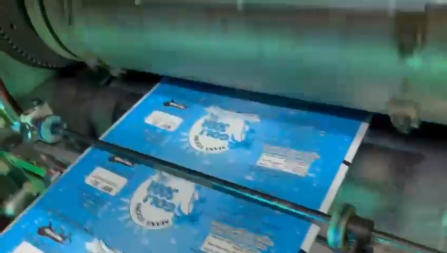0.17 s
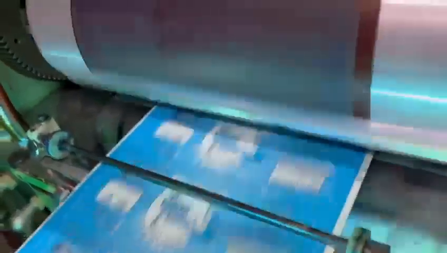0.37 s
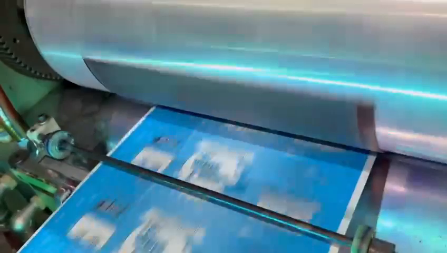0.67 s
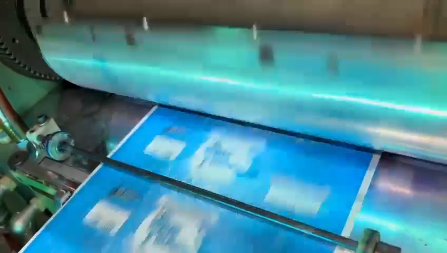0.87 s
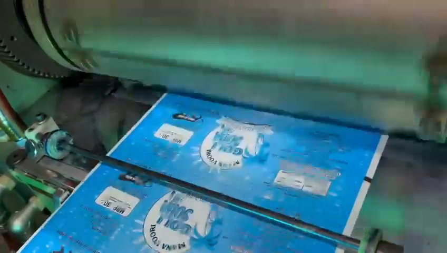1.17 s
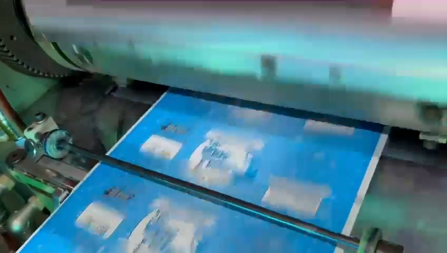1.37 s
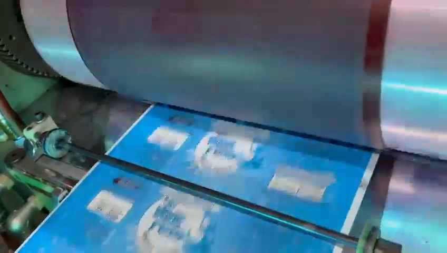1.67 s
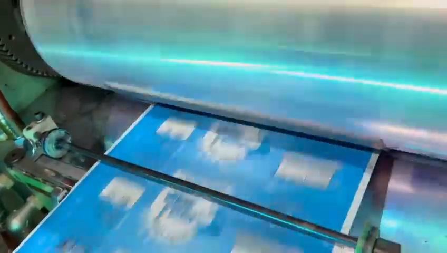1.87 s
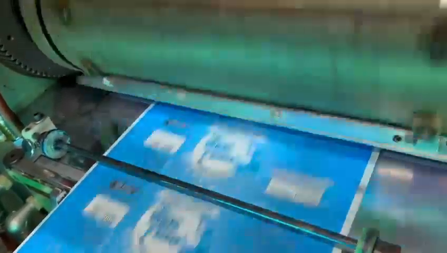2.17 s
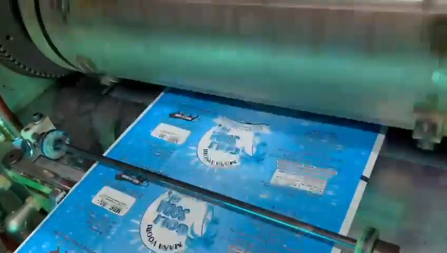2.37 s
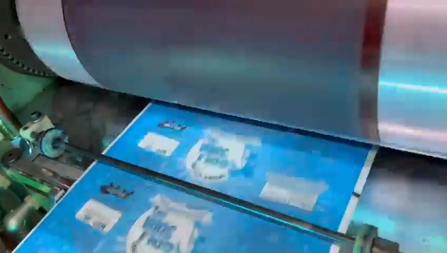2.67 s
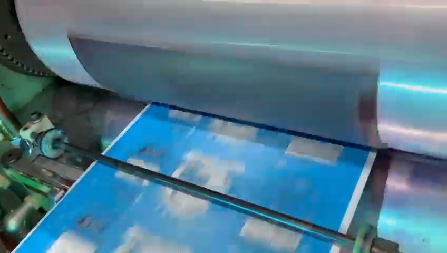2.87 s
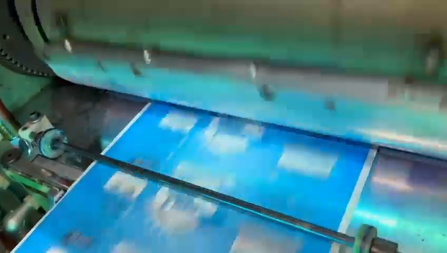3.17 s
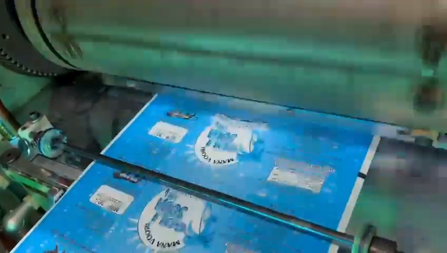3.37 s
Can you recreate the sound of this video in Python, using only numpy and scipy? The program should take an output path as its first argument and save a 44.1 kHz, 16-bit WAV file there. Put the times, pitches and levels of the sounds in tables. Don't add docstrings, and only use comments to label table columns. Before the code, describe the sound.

Dense rolling roar of a running printing press, faint gear tones, quick knocks and airy puffs.

```python
import sys
import numpy as np
from scipy import signal
from scipy.fft import rfft, irfft, next_fast_len
from scipy.io import wavfile
from scipy.ndimage import uniform_filter1d

SR = 44100
rng = np.random.default_rng(int(sys.argv[2]) if len(sys.argv) > 2 else 0)


def master(y):
    cut = np.clip(np.atleast_2d(y).T, -1, 1)
    pcm = np.round(cut * 32767)
    wavfile.write(sys.argv[1], SR, pcm.astype(np.int16))


def level_to_linear(level):
    exponent = np.asarray(level, float) / 20
    return 10 ** exponent


N = 155232

# (frequency [Hz], level [dB per Hz])
RUMBLE_SPECTRUM = [(22, -16), (48, -17), (65, -8.5), (100, 1), (200, -1.5), (300, -1), (420, -5),
                   (700, -17)]
# (frequency [Hz], level [dB per Hz])
ROAR_SPECTRUM = [(290, -30), (500, -4), (994, 0.5), (1310, -4.5), (1560, -3), (2350, -13.5), (2500, -11.5),
                 (2840, -14.5), (3300, -17), (4290, -43.5), (7260, -120)]
# (time [s], level [dB])
LOAD_SWELL = [(0, 1.5), (.3, -3.5), (.6, -3.5), (.9, -2), (1.2, -1), (1.5, -4.5), (1.8, -2.5), (2.1, -1.5),
              (2.4, -3.5), (2.7, -3), (3, -1), (3.25, -2), (3.52, -1.5)]
# (time [s], level [dB])
MESH_LEVEL = [(0, -31), (.3, -27.5), (.4, -42), (.5, -34), (.7, -41), (1.0, -29), (1.2, -30), (1.27, -27),
              (1.42, -29), (1.55, -41), (1.65, -32), (2.1, -33), (2.5, -30), (2.75, -41), (3.05, -33),
              (3.3, -27), (3.4, -31), (3.52, -28)]
# (time [s], level [dB])
WHINE_LEVEL = [(0, -48), (.36, -42), (.4, -34.5), (.52, -37), (.57, -38.5), (1.5, -39.5), (1.65, -40.5),
               (1.72, -51), (1.78, -36), (1.91, -42), (1.97, -36.5), (2.1, -46), (2.25, -37.5), (2.33, -40),
               (2.44, -36.5), (2.54, -42), (2.59, -37.5), (2.65, -41), (2.95, -42), (3.06, -33.5),
               (3.15, -33.5), (3.2, -43), (3.31, -45), (3.44, -32), (3.52, -46)]
# (frequency [Hz], level [dB], width [Hz])
MACHINE_HUMS = [(68, -41, 10), (92, -33, 24), (146, -32, 9), (190, -40, 8), (232, -40, 8), (537, -41, 7),
                (580, -43, 8), (700, -48, 8), (931, -47, 12), (1074, -46, 7), (1162, -48, 14),
                (1280, -51, 12), (1380, -51, 12), (1502, -51, 12), (1610, -54, 30), (1860, -54, 40),
                (2001, -52, 5), (2165, -55, 25), (2870, -56, 20), (3451, -54, 25), (3639, -63, 8),
                (4000, -64, 5), (5668, -60, 50), (6002, -59, 6), (6021, -60, 6), (6040, -62, 6),
                (6625, -63, 5), (6697, -61, 5), (6767, -60, 5)]
# (time [s], peak level [dB], pitch of the frame part [Hz])
CAM_KNOCKS = [(.006, -21.5, 266.4), (.014, -20, 147.4), (.143, -28, 560), (.151, -22, 431),
              (0.329, -27.5, 446), (0.377, -25.5, 289), (.481, -19, 323), (0.637, -26, 208),
              (.712, -23, 297), (0.804, -32.5, 330), (.843, -32, 462), (1.055, -23.5, 328),
              (1.097, -19.5, 283.4), (1.11, -23.5, 180), (1.262, -22.5, 256.4), (1.274, -24, 468),
              (1.594, -24.5, 333), (1.827, -25.5, 301), (1.963, -25, 470), (2.173, -24, 242),
              (2.192, -21.5, 157), (2.225, -23, 461), (2.241, -27, 195), (2.264, -28.5, 236),
              (2.291, -23, 136), (2.378, -26, 248), (2.386, -22, 414), (2.412, -25.5, 155),
              (2.715, -25, 306.5), (2.899, -25.5, 188), (2.947, -23.5, 253), (3.125, -22.5, 181),
              (3.218, -19.5, 117), (3.282, -21.5, 454), (3.292, -23, 343), (3.343, -31, 207),
              (3.46, -30, 128), (3.495, -25, 243), (3.503, -29, 425)]
# (multiple of the knock's pitch [1], level [dB])
FRAME_MODES = [(.62, -8), (1.0, 0), (1.3, -8), (1.75, -12), (2.3, -8), (3.0, -12), (4.1, -16)]
# (time [s], peak level [dB])
GRIPPER_SNAPS = [(.5796, -31), (.7063, -33), (.8435, -32), (.8649, -32), (1.0525, -28), (1.0585, -24),
                 (1.0665, -28), (1.088, -28), (1.6926, -32), (1.9465, -32), (2.1778, -23), (2.186, -28),
                 (2.2008, -22), (2.2055, -27), (2.218, -29), (2.24, -30), (2.3845, -32), (2.5222, -31),
                 (2.808, -34), (3.2945, -25), (3.348, -31)]
# (frequency [Hz], level [dB], width [Hz])
FINGER_MODES = [(3900, 0, 350), (4700, 0, 350), (5600, -4, 450), (6500, -2, 450), (8300, -9, 700),
                (10500, -14, 1200)]
# (time into the turn [s], level [dB])
SUCTION_SWELL = [(0, -35), (.2, -39), (.55, -37.5), (.6, -38), (.65, -37), (.85, -33.5), (.95, -35),
                 (1.05, -33.5), (1.118, -36)]
# (time [s], peak level [dB])
VALVE_PUFFS = [
    (0.575, -36.5),
    (0.844, -43),
    (1.052, -32),
    (1.084, -36),
    (1.693, -40),
    (1.943, -40),
    (2.175, -30.5),
    (2.2, -35.5),
    (2.811, -44),
    (3.292, -40.5),
]
# (frequency [Hz], level [dB per Hz])
HISS_SPECTRUM = [(2500, -19.5), (3400, 3.5), (4500, 2.5), (6500, 6.5), (7200, -4.5), (9000, -4),
                 (10000, 1.5), (11500, -4.5), (12200, -12)]
# (frequency [Hz], share [0-1])
DIRECT_SHARE = [(25, 0.8), (60, 1), (125, 0.95), (250, 0.89), (500, 0.55), (1000, 0.07), (2400, 0.83),
                (4000, 0), (9000, 0.05)]
# (frequency [Hz], level difference [dB])
LEFT_LEAN = [(100, -0.2), (250, -0.7), (500, -3.5), (700, -1), (900, 2), (1200, 0.5), (2200, -1.1),
             (5500, 1.7)]
# (frequency [Hz], width [Hz], depth [0-1])
ECHO_DIPS = [(3160, 80, .25), (3330, 50, .2), (3560, 50, .25), (3760, 25, .3), (5490, 60, .4),
             (5870, 30, .3)]
# (frequency [Hz], level against the usual [dB])
MID_LIMITS = [(800, -14), (1300, -6.5), (1500, -4.5), (1900, -4), (2300, -10), (3000, -5.5), (3200, -1.5),
              (3500, -3), (4300, -2.2), (5500, -3.5), (6800, -3.5), (7200, -2.5), (8800, -4), (11500, 2.8)]
# (frequency [Hz], level against the usual [dB])
SIDE_LIMITS = [(1000, -20), (2500, -6), (4200, -3), (6300, -5), (6950, 5), (7450, 7), (8300, -1),
               (8900, -5.5)]


def rms_one(x):
    return x / np.sqrt(np.mean(x ** 2) + 1e-20)


def in_time(rows, t):
    return np.interp(t, *np.transpose(rows))


def at_hz(points, hz):
    table = np.array(points)
    return np.interp(np.log(hz), np.log(table[:, 0]), table[:, 1])


def drift(rate):
    r = np.exp(-80 * np.pi * rate / SR)
    white = rng.standard_normal(N // 40 + 2002)
    slow = signal.lfilter([1], [1, -2 * r, r * r], white)[2000:]
    return np.interp(np.arange(N) / 40, np.arange(len(slow)), rms_one(slow))


def resonate(x, hz, width_hz):
    r = np.exp(-np.pi * width_hz / SR)
    ringing = [1, -2 * r * np.cos(2 * np.pi * hz / SR), r * r]
    return signal.lfilter([1 - r, 0, r - 1], ringing, x + 1e-18)


def banded(spectrum, patchy_db, grain_db):
    together = drift(4.4)
    grain = rng.standard_normal((2, 1, N // 64 + 1)).repeat(64, axis=2)[..., :N]
    white = rng.standard_normal((2, 3, N)) * level_to_linear(grain_db * grain)
    lowest, highest = spectrum[0][0], spectrum[-1][0]
    edges = np.geomspace(lowest, highest, int(3 * np.log2(highest / lowest)) + 2)
    out = 0
    for k, (low, high) in enumerate(zip(edges, edges[1:])):
        bandpass = signal.butter(2, [low, high], "band", fs=SR, output="sos")
        band = signal.sosfilt(bandpass, white[k % 2])
        flicker_db = patchy_db * (.3 * together + drift(14.0))
        out = out + level_to_linear(at_hz(spectrum, np.sqrt(low * high)) + flicker_db) * band
    return rms_one(out)


def rolling_rumble(load_db):
    return level_to_linear(-25 + .5 * load_db) * banded(RUMBLE_SPECTRUM, patchy_db=-0.06, grain_db=2.5)


def roller_roar(load_db):
    return level_to_linear(-28.5 + 1.26 * load_db) * banded(ROAR_SPECTRUM, patchy_db=2.2, grain_db=-0.9)


def gears():
    t = np.arange(N) / SR
    mesh_hz = 465.5 + 3.0 * drift(8.0)
    phase = 2 * np.pi * np.cumsum(mesh_hz) / SR + rng.uniform(0, 2, (3, 1))
    mesh_db = in_time(MESH_LEVEL, t) - 1.0 + 2.4 * drift(14.0)
    out = level_to_linear(mesh_db) * (np.sin(phase) + level_to_linear(-12) * np.sin(2 * phase))
    white = rng.standard_normal((3, N + SR))
    whine_db = in_time(WHINE_LEVEL, t) - 3.0 + 0.69 * drift(32.0)
    whines = [(2289, whine_db, 34), (2313, whine_db - 4, 34)]
    for hz, db, width_hz in MACHINE_HUMS + whines:
        hum = resonate(resonate(white, hz, width_hz), hz, width_hz)
        out = out + level_to_linear(db) * rms_one(hum[:, SR:])
    return out


def knocks():
    rise_s, fall_s = .004, .0095
    size = SR // 5
    out = np.zeros((3, N + SR))
    u = np.arange(size) / SR
    for s, db, hz in CAM_KNOCKS:
        start = int(s * SR)
        draw = rng.standard_normal((3, 3, len(FRAME_MODES), 1))
        for k, (multiple, level_db) in enumerate(FRAME_MODES):
            age = u * multiple ** .4
            shape = 4.6 * (np.exp(-age / fall_s) - np.exp(-age / rise_s))
            mode_hz = multiple * hz * (1 + .03 * draw[0, :1, k])
            phase = draw[1, :1, k] * 2 + .6 * draw[1, :, k]
            ring = np.sin(2 * np.pi * mode_hz * u + phase)
            out[:, start:start + size] += level_to_linear(db + level_db + 1.5 * draw[2, :, k]) * shape * ring
    return out[:, :N]


def gripper_ticks():
    out = np.zeros((3, N))
    snaps = np.array(GRIPPER_SNAPS)
    draw = rng.standard_normal((len(snaps), 2, len(FINGER_MODES), 3))
    at = (snaps[:, 0] * SR).astype(int)
    hits = [(0, 10), (.0014, -2.5)]
    for k, (hz, db, width_hz) in enumerate(FINGER_MODES):
        clicks = np.zeros((3, N + SR))
        for hit, (lag_s, hit_db) in enumerate(hits):
            size = level_to_linear(snaps[:, 1:] + db + hit_db - 10.0 + 1.5 * draw[:, hit, k])
            direction = np.sign(draw[:, 1 - hit, k])
            clicks[:, at + int(lag_s * SR)] = (size * direction).T
        out += resonate(clicks[:, :N], hz, width_hz) * SR / (2 * np.pi * width_hz)
    return out


def suction_air():
    turn_s, puff_rise_s, puff_fall_s = 1.118, 0.0022, 0.01
    t = np.arange(N) / SR
    gain = level_to_linear(in_time(SUCTION_SWELL, t % turn_s))
    for s, db in VALVE_PUFFS:
        u = np.maximum(t - s, 0)
        gain = gain + 2 * level_to_linear(db) * (np.exp(-u / puff_fall_s) - np.exp(-u / puff_rise_s))
    return gain * banded(HISS_SPECTRUM, patchy_db=1.18, grain_db=0.5)


def ports(field):
    lag_s, lag_from_hz = 0.00035, 243
    size = next_fast_len(N + 1000)
    direct, left, right = rfft(field, size)
    hz = np.arange(len(direct)) * SR / size + 1
    share = np.clip(at_hz(DIRECT_SHARE, hz), 0, 1)
    shared, hall = np.sqrt(share) * direct, np.sqrt(1 - share)
    lag = np.exp(-2j * np.pi * hz * lag_s / (1 + (lag_from_hz / hz) ** 4))
    lean = level_to_linear(at_hz(LEFT_LEAN, hz) / 2)
    pair = np.array([lean * (shared + hall * left), (shared * lag + hall * right) / lean])
    for at, width_hz, depth in ECHO_DIPS:
        pair = pair * (1 - depth / (1 + ((hz - at) / width_hz) ** 2))
    return irfft(pair, size)[:, :N]


def silence_weak(x, limits, passed):
    hz, _, cells = signal.stft(x, SR, "cosine", 2048, 1024)
    power = uniform_filter1d(np.abs(cells) ** 2, size=4, axis=0)
    usual = uniform_filter1d(uniform_filter1d(power, size=30, axis=0), size=7, axis=1)
    keep = power > usual * level_to_linear(2 * at_hz(limits, hz + 1))[:, None]
    return signal.istft(cells * keep * passed(hz)[:, None], SR, "cosine", 2048, 1024)[1][:N]


def mid_passed(hz):
    return np.where(hz > 11050, level_to_linear(-1.5), hz < 9000) * (hz < 11950)


def side_passed(hz):
    return hz < 11700


def scene():
    load_db = in_time(LOAD_SWELL, np.arange(N) / SR)
    load_db = load_db - load_db.mean()
    rolling = rolling_rumble(load_db) + roller_roar(load_db)
    return ports(rolling + gears() + knocks() + gripper_ticks() + suction_air())


def roll_off(x):
    return signal.sosfilt(signal.butter(12, 11990, fs=SR, output="sos"), x)


def record(dry):
    bass_cut = signal.butter(2, 15, "high", fs=SR, output="sos")
    left, right = signal.sosfilt(bass_cut, dry)
    mid = silence_weak((left + right) / 2, MID_LIMITS, mid_passed)
    side = silence_weak((left - right) / 2, SIDE_LIMITS, side_passed)
    return roll_off(np.array([mid + side, mid - side]))


dry = scene()
out = record(dry)
master(out)
```